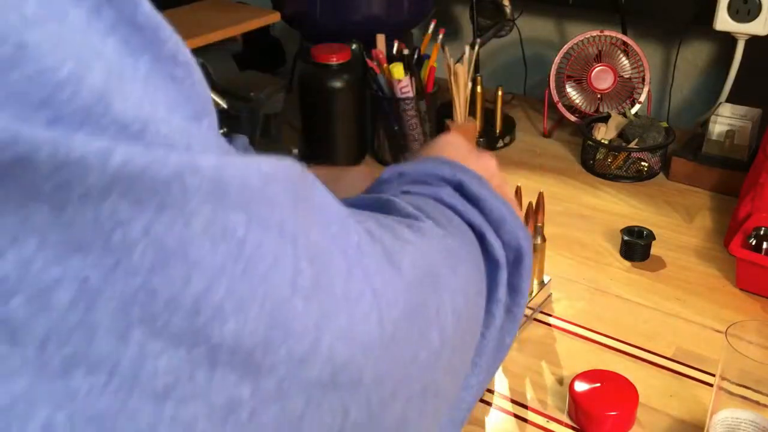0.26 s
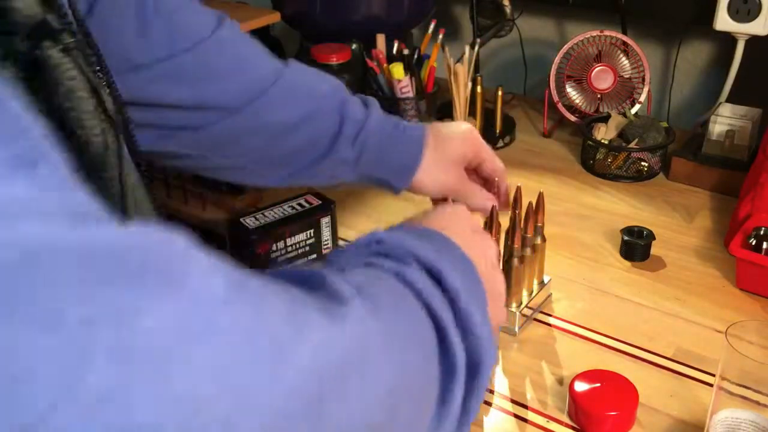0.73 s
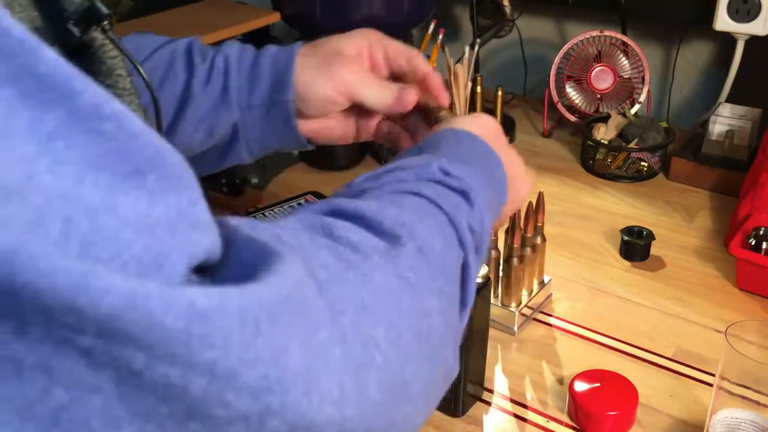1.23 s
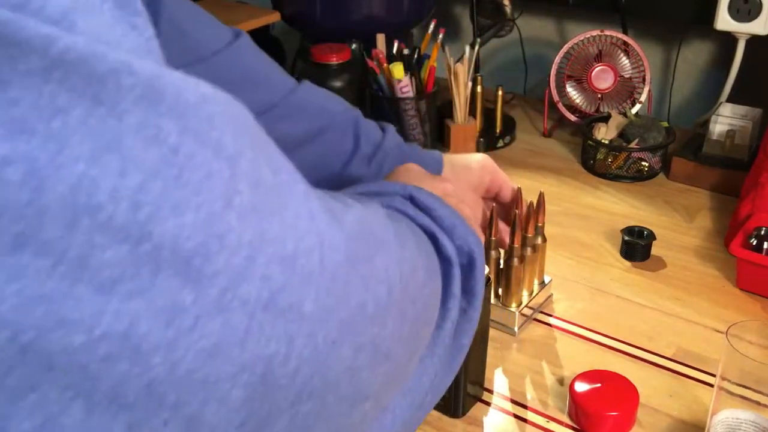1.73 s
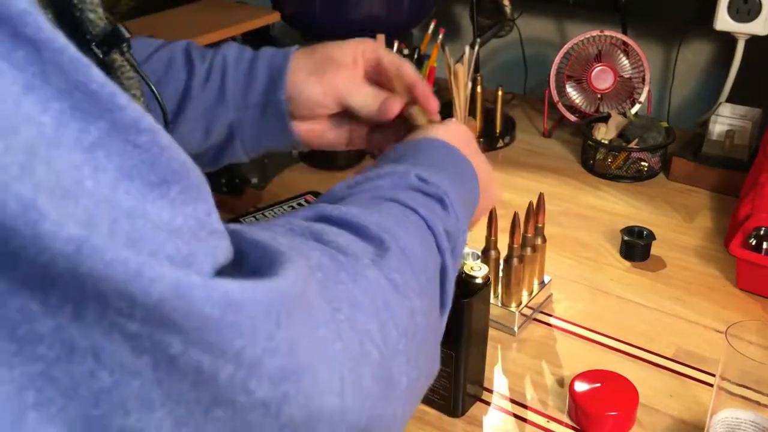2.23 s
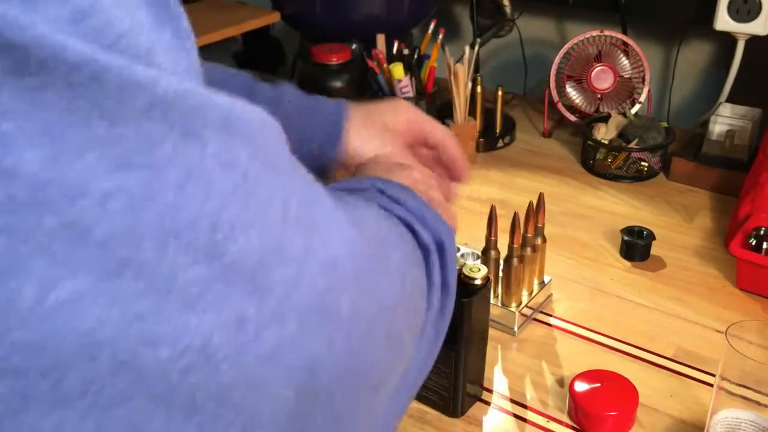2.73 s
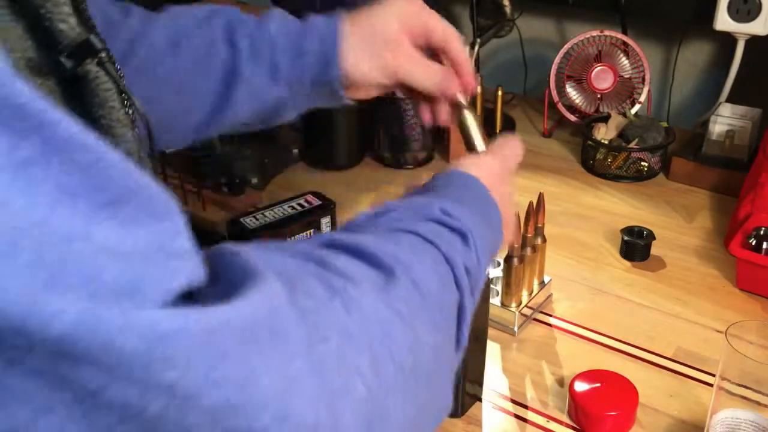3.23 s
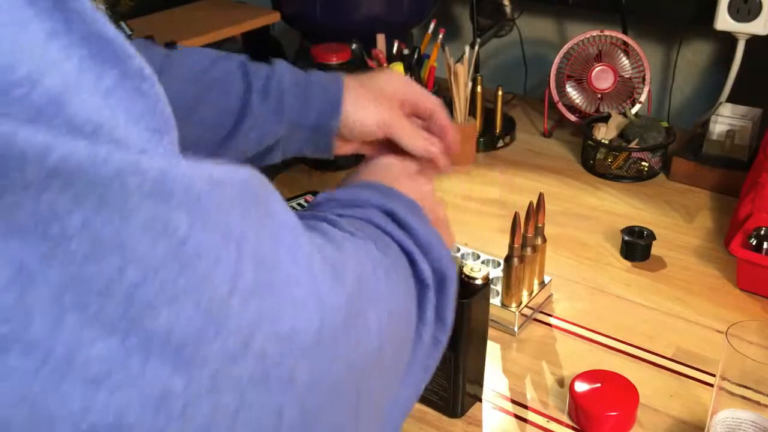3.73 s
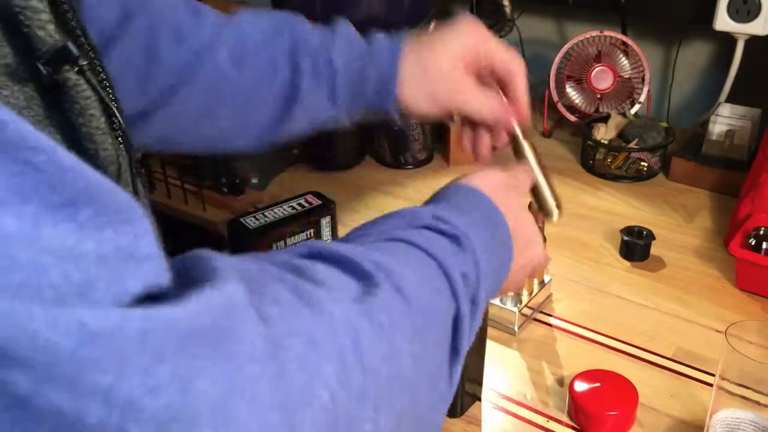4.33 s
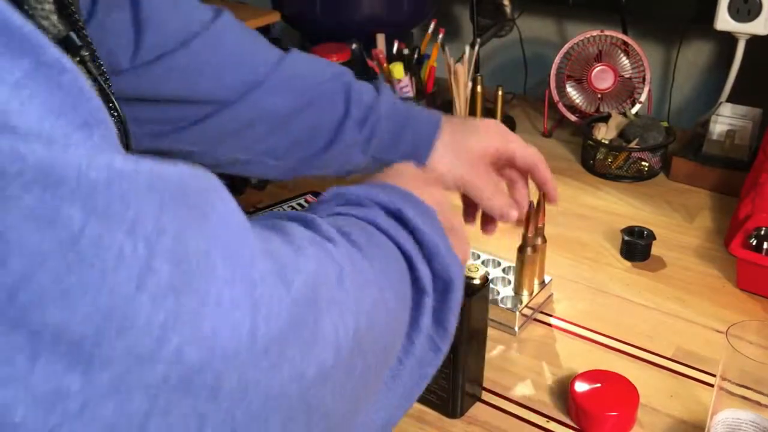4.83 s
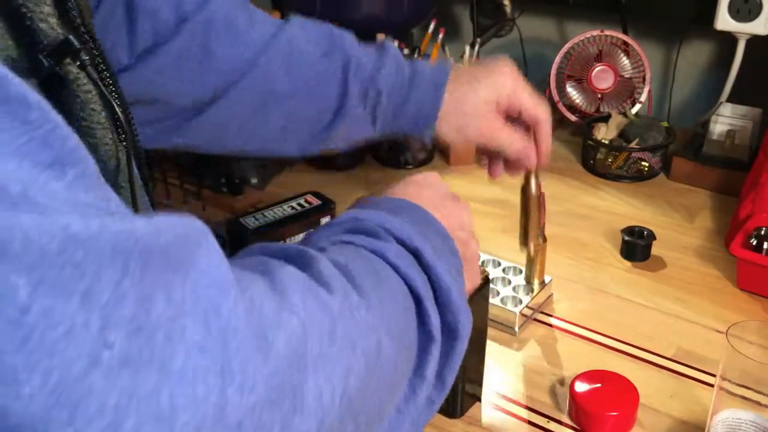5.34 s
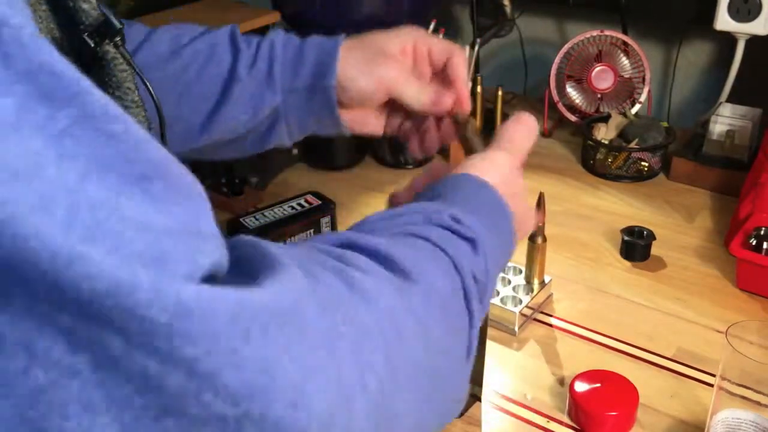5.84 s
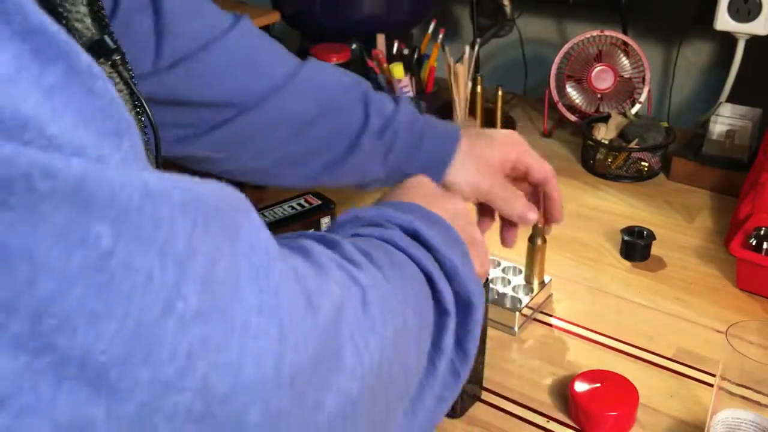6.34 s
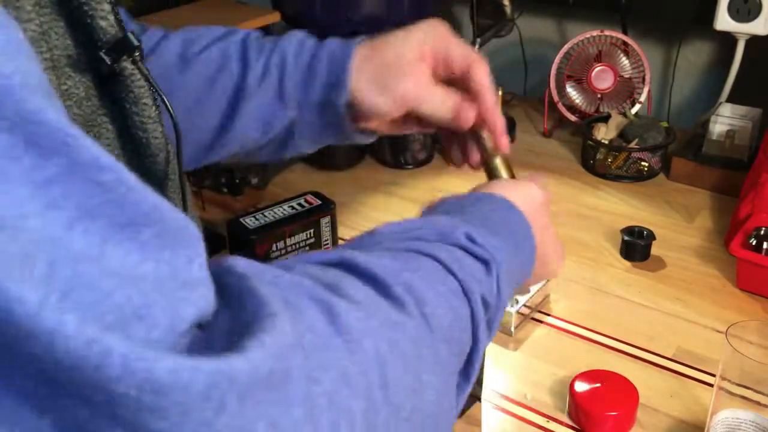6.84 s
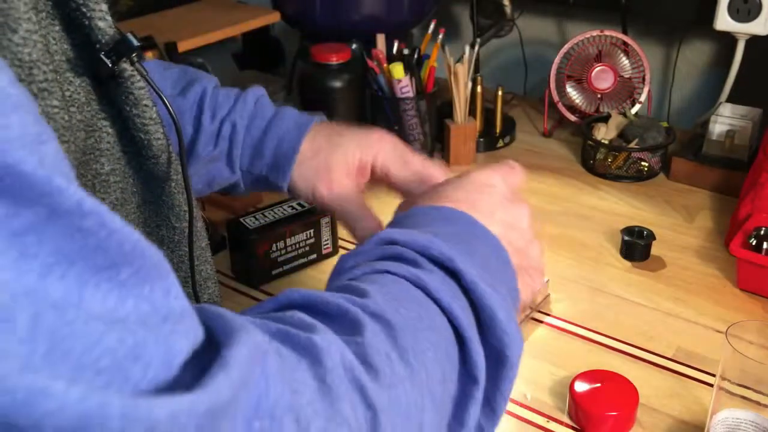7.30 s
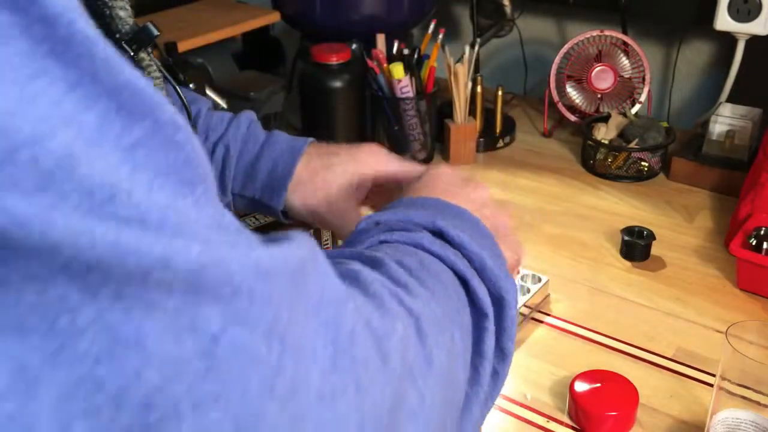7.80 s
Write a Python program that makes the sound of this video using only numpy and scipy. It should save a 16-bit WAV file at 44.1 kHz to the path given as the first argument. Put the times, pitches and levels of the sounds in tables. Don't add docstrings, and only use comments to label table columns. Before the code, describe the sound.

Close to the microphone, hands move brass cartridges from a metal block into a hollow plastic box on a wooden bench. Roughly once a second comes a cluster of loud boxy knocks with metal ticks, separated by light taps, thin ringing pings and short scrapes. Small dry room, faint hum and low handling rumble; the hardest hits overload slightly.

```python
import sys
import numpy as np
from scipy import signal
from scipy.fft import rfft, irfft, next_fast_len
from scipy.io import wavfile
from scipy.ndimage import uniform_filter1d

SR = 44100
rng = np.random.default_rng(int(sys.argv[2]) if len(sys.argv) > 2 else 0)


def natural_amplitude(level_db):
    exponent = np.asarray(level_db, float) / 20
    return 10 ** exponent


def materialize(psi):
    bounded = np.clip(np.atleast_2d(psi).T, -1, 1)
    quanta = np.round(bounded * 32767).astype(np.int16)
    wavfile.write(sys.argv[1], SR, quanta)


N = 355710
END_S = 8.066

# frequency in Hz, density in dB per Hz.
AIR_SPECTRUM = [(53, -19.5), (100, -6), (140, -9.5), (300, -15), (660, -16), (1000, -24.5), (7070, -36),
                (16100, -44.5)]
AIR_DB = -57.5
# frequency in Hz, level in dB rms.
HUM_PARTIALS = [(118.4, -55.5), (242.2, -84.5), (360.7, -65), (479.1, -81), (597.5, -67), (721.4, -74.5)]
# time in seconds, level in dB.
ARM_RUMBLE = [(0.0, -35.5), (1.17, -45.5), (1.5, -37), (1.68, -40.5), (2.13, -40), (2.36, -39.5),
              (3.39, -35), (3.57, -40), (5.5, -44.5), (5.91, -38), (6.31, -46), (6.81, -40.5), (7.77, -44),
              (8.07, -38.5)]
# frequency in Hz, t60 in seconds, strength in dB.
ROOM_BANDS = [(101, 0.3, 16.5), (496, 0.27, 2.5), (2000, 0.28, 5), (5870, 0.19, 4.5), (11760, 0.24, 1.5)]

# start in seconds, length in seconds, level in dB.
SLEEVE_SWISHES = [
    (1.2, 0.44, -61.5),
    (0.088, .16, -63),
    (9.5, 0.27, -71.5),
]
# start in seconds, level in dB, frequency in Hz.
ELBOW_BUMPS = [(0.956, -35, 180), (1.27, -28, 92), (1.369, -25.5, 19), (3, -38, 46), (2.2, -33.5, 14.3),
               (2.269, -26.5, 28), (2.401, -38.5, 103), (3.391, -18.5, 26), (4.54, -28.5, 74),
               (5.12, -23, 160), (7.25, -34, 220), (7.42, -28, 190), (8.0, -21, 91)]
# start in seconds, level in dB.
NEAR_CLICKS = [
    (.160, -40),
    (2.278, -38.5),
    (3.361, -31.5),
    (4.544, -39),
    (6.838, -55),
]

# start in seconds, level in dB, frequency in Hz.
CASE_PINGS = [(.436, -31.5, 3120), (.485, -26.5, 3075), (1.652, -34, 3130), (5.307, -51, 4240),
              (5.34, -66, 4450), (5.608, -41.5, 3050), (6.65, -33.5, 3014)]
# start in seconds, level in dB, frequency in Hz.
NECK_PINGS = [(.976, -45.5, 7450), (1.003, -31.5, 7340), (1.033, -34.5, 8300), (1.033, -36, 11640),
              (1.103, -37, 7300), (1.653, -50, 7320), (2.689, -33, 7460), (2.892, -33.5, 7340),
              (5.025, -53, 6520), (5.307, -44, 6370), (5.382, -46.5, 6430), (5.587, -51, 8400),
              (5.608, -61, 8200), (5.666, -29, 7370), (5.697, -38.5, 7400), (6.433, -43, 8200),
              (7.92, -25.5, 7180)]
# start in seconds, level in dB, frequency in Hz.
BLOCK_PINGS = [(1.652, -47.5, 2200), (7.21, -34, 2000), (7.344, -44, 2000), (5.644, -26, 2030),
               (7.425, -37, 2030), (7.739, -23.5, 1964), (7.888, -18.5, 2030), (7.906, -13, 1979),
               (7.998, -19.5, 2070), (8.01, -22, 2000)]
# start in seconds, level in dB, frequency in Hz.
RATTLES = [(.977, -35, 3290), (1.005, -30.5, 3200), (1.033, -22, 3230), (1.045, -31, 2940),
           (1.103, -24, 3078), (5.45, -42, 2880), (6.433, -28, 2890), (7.228, -46.5, 3150),
           (7.261, -36, 3230), (7.39, -38, 3280)]
# start in seconds, level in dB, frequency in Hz.
GRIPPED_PINGS = [(3.848, -21, 1200), (5.681, -12.5, 1963), (6.597, -48, 3050), (6.598, -46, 4430),
                 (7.203, -23.5, 1920), (7.203, -25.5, 1230), (7.297, -54, 2090), (7.418, -27.5, 2010),
                 (7.663, -28.5, 730), (7.738, -33, 1000), (.448, -33, 2920), (2.837, -31, 797),
                 (3.967, -10.5, 1091), (3.981, -11.5, 898), (3.998, -8.5, 1003), (6.481, -17, 900),
                 (1.864, -7, 680), (5.642, -12, 800), (6.259, -8.5, 810), (7.885, -10.5, 750)]
# start in seconds, level in dB, frequency in Hz.
BENCH_BOOMS = [(.262, -34, 190), (.62, -22.5, 270), (.913, -21.5, 262), (.951, -18.5, 230),
               (1.106, -26, 217), (1.655, -38.5, 271), (2.003, -35, 198), (2.67, -30.5, 384),
               (3.152, -28, 209), (3.225, -39, 200), (3.361, -35.5, 170), (4.237, -27, 400),
               (4.998, -27.5, 300.6), (5.31, -34, 241)]
# start in seconds, level in dB, frequency in Hz.
FREE_LINES = [(2.012, -40, 4500), (2.013, -39, 3250), (2.014, -59.5, 9360), (3.18, -49, 4600),
              (4.33, -48, 4446), (4.33, -65, 9400), (5.305, -50, 4400), (5.378, -50, 4400),
              (5.17, -62, 4100), (5.38, -48.5, 3200)]
# events, t60 in seconds, chatter decay in seconds.
PING_KINDS = [(CASE_PINGS, 0.095, 0.03), (NECK_PINGS, 0.052, 0.012), (BLOCK_PINGS, 0.045, 0.017),
              (RATTLES, 0.034, 0.01), (GRIPPED_PINGS, 0.03, 0.0047), (BENCH_BOOMS, 0.041, 0.017),
              (FREE_LINES, 0.086, 0.02)]
CHATTER_SHARE = 0.35

# start in seconds, length in seconds, level in dB, frequency in Hz.
SETTLING_HUMS = [(1.866, 0.072, -16.5, 640), (2.93, 0.076, -36.5, 610), (3.23, 0.043, -44.5, 261),
                 (3.285, 0.074, -51.5, 750), (5.06, 0.067, -35.5, 566), (5.32, 0.046, -41.5, 424),
                 (5.643, 0.072, -19.5, 553), (.634, .03, -12.5, 616), (2.885, .014, -12, 600),
                 (3.07, 0.062, -48, 1680), (5.073, 0.023, -33, 1640), (6.262, 0.03, -17.5, 610),
                 (7.44, .04, -55, 3280)]
# start in seconds, length in seconds, level in dB, frequency in Hz.
DRAG_HUMS = [(0.276, 0.015, -41, 710), (.88, 0.062, -37.5, 600), (1.034, 0.039, -33.5, 1750),
             (1.039, 0.039, -40, 3080), (1.107, 0.052, -55, 3120), (1.798, 0.014, -32.5, 1720),
             (1.998, 0.034, -38, 1740), (2.92, 0.098, -39.5, 1080), (3.069, 0.031, -54, 3120),
             (3.078, 0.046, -41, 1024), (3.171, 0.039, -44.5, 3170), (3.183, 0.027, -57, 4600),
             (3.216, 0.036, -41, 1680), (4.31, 0.04, -49, 1950), (4.315, 0.048, -46.5, 1694),
             (5.302, 0.1, -61, 4400), (6.384, 0.17, -42, 1960), (6.6, 0.034, -55, 4270),
             (7.209, 0.076, -48, 1150), (7.218, 0.098, -52, 563), (7.331, 0.039, -48.5, 585),
             (7.553, 0.11, -52, 576), (7.568, 0.084, -49, 1120), (7.575, 0.11, -49, 2040),
             (7.6, 0.073, -54.5, 3170), (7.624, 0.068, -40.5, 590), (7.677, 0.16, -45, 596),
             (7.708, 0.019, -54, 1510), (7.71, 0.037, -46, 3290), (7.757, 0.031, -33, 940),
             (7.78, 0.032, -48, 2000), (7.892, 0.03, -26.5, 3250), (7.995, 0.011, -27, 3425)]
DRAG_T60_S = 0.038

# start in seconds, length in seconds, scrape level in dB,
# case song level in dB, song tilt in dB per octave.
SLIDES = [(0.264, 0.077, -46.5, -71.5, 9), (0.32, 0.15, -49.5, -72, 3), (0.977, 0.244, -42.5, -76.5, -13),
          (1.994, 0.048, -46.5, -54.5, 1.5), (3.055, 0.046, -50, -68, -5.5),
          (3.153, 0.064, -42, -59.5, 1.5), (3.24, 0.094, -48, -83, -7), (3.21, 0.024, -39, -63.5, 9),
          (3.947, 0.031, -47.5, -78, 3.5), (4.302, 0.084, -50, -56, 6.5), (4.969, 0.18, -46.5, -78, -6.5),
          (5.288, 0.09, -44.5, -66.5, -1.5), (5.365, 0.04, -49, -56.5, -7.5),
          (6.389, 0.088, -46, -67.5, -1.5), (6.593, 0.08, -47.5, -40.5, -8),
          (7.202, 0.165, -59.5, -71.5, -12.5), (7.39, 0.074, -66, -78, -6.5), (7.583, 0.13, -63, -66, 6),
          (7.707, 0.13, -49, -60, -3)]
# frequency in Hz, level in dB, t60 in seconds.
CASE_MODES = [(3040, 0, .11), (3230, -12, .1), (4390, -5, .13), (6350, -13, .07), (6520, -11, .1),
              (9420, -21, .14), (10190, -20, .14), (13170, -33, .14), (13640, -33, .1), (15300, -44, .08)]
SCRAPE_HZ, SLIDE_FADE_DB = 2412, -12

# frequency in Hz, level in dB, t60 in seconds.
BOX_MODES = [(290, -8.5, 0.076), (408, -6.5, 0.05), (572.3, 5, 0.062), (634.5, 1, 0.049),
             (760, -3.5, 0.052), (895, 1, 0.052), (980, -1, 0.036), (1080, -2.5, .06), (1286, -5, 0.045),
             (1280, -6, 0.1), (1554, -12.5, 0.12), (1760, -7.5, 0.045)]
# frequency in Hz, density in dB per Hz.
TICK_SPECTRUM = [(2350, -32), (4000, -11), (4490, 8), (5450, 11), (7290, 6), (15200, -19.5), (16100, -30)]
LUMP_DB = 3.5
MODE_LUMP_DB, MODE_SPREAD_SHARE = 1.5, 0.008
AIR_MODES_HZ = (500, 700)
EMPTY_RISE_SHARE, FILL_S = 0.2, 2.2
SOFT_LINGER_DB_PER_DB = 0.092

# start in seconds, hollow level in dB, clack level in dB, tick level in dB.
FLOOR_THUDS = [(.446, -18.5, -26, -22.5), (.632, 0, -16, -17.5), (.651, -3.5, -16.5, -17),
               (1.868, 1, -7, -13), (1.881, -1, -15.5, -14.5), (1.908, 1.5, -9.5, -16),
               (2.85, 6, -3.5, -11.5), (2.865, 7, -8, -13), (2.874, -3.5, -14.5, -11),
               (2.886, -0.5, -20.5, -30), (3.848, -13, -26.5, -31), (3.988, -1, -19, -10.5),
               (4, 0, -24, -11.5), (4.007, 1, -23.5, -24.5), (4.033, -27.5, -44, -65),
               (5.074, -10, -22, -42.5), (5.642, -2.5, -20.5, -30.5), (5.65, -4, -11, -24),
               (5.664, -3.5, -20, -21.5), (5.681, 2, -7, -16), (5.695, -22.5, -46, -31),
               (6.262, -17.5, -27.5, -39.5), (6.455, -14.5, -18, -33), (7.884, -6, -26, -17.5),
               (7.892, -2, -14, -20), (7.906, -3.5, -18, -12.5), (7.913, 4, -22.5, -18),
               (8.01, -3.5, -38, -40)]
# start in seconds, hollow level in dB, clack level in dB, tick level in dB.
CHOKED_REBOUNDS = [(.435, -10, -27, -33), (.484, -24, -29, -53), (.612, -4.5, -14, -55),
                   (.625, -27, -21, -34), (.641, 1.5, -3.5, -10.5), (.667, -18.5, -36, -66),
                   (.699, -16.5, -43, -44), (1.654, -33.5, -26.5, -50), (1.774, -8.5, -29, -42),
                   (1.924, -6, -24, -35), (2.001, -27, -23.5, -49), (2.013, -42.5, -24, -33),
                   (2.669, -19, -17.5, -31), (4.021, -6.5, -24, -37), (5.086, -13, -47, -54),
                   (6.271, -12, -18, -16), (6.485, 1, -12.5, -22), (6.494, -16, -29, -32),
                   (7.204, -31, -33, -46.5), (7.418, -15, -31, -46), (7.75, -23, -17.5, -21.5),
                   (7.923, -4.5, -14, -31)]
# start in seconds, hollow level in dB, clack level in dB, tick level in dB.
SLOT_TAPS = [(.494, -30, -25, -26.5), (.887, -37.5, -33, -68), (.975, -27.5, -23, -40.5),
             (1.799, -14, -19.5, -49), (1.959, -32.5, -35, -30.5), (2.691, -15, -19, -25.5),
             (2.77, -14.5, -29, -32.5), (3.239, -29.5, -30.5, -49), (4.319, -35, -31, -54.5),
             (5.051, -18, -46.5, -50), (5.305, -22.5, -27.5, -62), (5.45, -35, -32, -38.5),
             (5.555, -32, -39.5, -74), (5.607, -25.5, -28.5, -32), (6.403, -16, -27.5, -33),
             (6.431, -16.5, -24, -32), (6.594, -17, -32.5, -40), (7.344, -40.5, -43, -65.5),
             (7.441, -22, -27, -40), (7.71, -33, -35, -60)]
# start in seconds, hollow level in dB, clack level in dB, tick level in dB.
RIM_STRIKES = [(.325, -41, -32.5, -46), (.615, 3, -6, -8.5), (1.002, -30, -23, -24),
               (1.03, -16, -19.5, -19.5), (1.667, -37.5, -42, -38.5), (1.824, -21, -32, -52.5),
               (1.896, 2.5, -5, -9), (2.032, -37, -23, -49), (2.844, -2.5, -20, -27),
               (2.911, -12.5, -35, -38.5), (3.966, -10, -36, -27), (3.979, -2.5, -38.5, -20),
               (4.981, -18.5, -28.5, -40), (5.221, -31.5, -42, -67), (5.585, -27.5, -29, -42),
               (7.26, -41, -25, -37), (7.394, -43, -41, -38), (7.561, -31, -41, -66),
               (7.663, -20.5, -30.5, -29), (7.737, -19, -24, -42), (7.764, -36, -23, -33),
               (7.844, -16, -32, -33), (7.996, 2, -8, -15.5)]
# start in seconds, hollow level in dB, clack level in dB, tick level in dB.
BLOCK_ROCKS = [(.26, -36.5, -31, -38), (.911, -19, -26, -67.5), (3.086, -22, -55, -76.5),
               (3.218, -34, -19, -15.5), (4.236, -21, -28.5, -75), (4.292, -30, -37.5, -53),
               (4.996, -23.5, -26, -48), (5.291, -31, -45, -65), (5.379, -36.5, -35, -63),
               (6.648, -39.5, -35, -57), (7.242, -43.5, -34, -40), (7.538, -58, -37, -47)]
# start in seconds, hollow level in dB, clack level in dB, tick level in dB.
KNUCKLE_NUDGES = [(.549, -15.5, -22, -29), (.95, -17, -34, -68), (1.102, -20.5, -21, -31),
                  (1.863, -10, -17, -20.5), (3.071, -29.5, -27.5, -56.5), (3.151, -25, -34.5, -58),
                  (4.09, -26.5, -29, -54.5), (5.024, -28.5, -36.5, -38)]
# start in seconds, hollow level in dB, clack level in dB, tick level in dB.
EDGE_SNAPS = [(.285, -36, -54, -66), (.551, -9.5, -38, -43), (.618, -2, -18.5, -28),
              (2.771, -36.5, -43, -53), (3.293, -43, -44, -58), (3.848, -16, -31, -46),
              (3.967, -8.5, -23, -37), (3.981, -4, -30, -24), (3.999, 0, -14, -27), (4.237, -26, -34, -65),
              (4.337, -34, -24.5, -52), (6.465, -14, -26, -42), (7.202, -23, -31, -40),
              (7.225, -36, -36, -47), (7.285, -39, -39, -50), (7.305, -49, -42, -54), (7.36, -43, -44, -55),
              (7.463, -38, -35, -46), (7.495, -52, -52, -60), (7.553, -42, -51, -59),
              (7.785, -30, -33, -48.5), (7.851, -20.5, -23, -40)]
# start in seconds, hollow level in dB, clack level in dB, tick level in dB.
FLAT_DROPS = [
    (6.258, -2.5, -17.5, -28),
]
# start in seconds, hollow level in dB, clack level in dB, tick level in dB.
BOX_JOLTS = [
    (.966, -18.5, -45, -70),
    (1.866, -20, -50, -70),
    (5.31, -25, -48, -70),
    (6.592, -17.5, -47, -60),
    (7.887, -17.5, -50, -70),
    (7.997, -5, -50, -70),
]
# events, favoured pitch in Hz, full-blow ring time in seconds, loose crunch in dB.
BLOW_KINDS = [(FLOOR_THUDS, 571, 0.069, -7.5), (CHOKED_REBOUNDS, 546, 0.057, -8), (SLOT_TAPS, 670, 0.051, -5.5),
              (RIM_STRIKES, 920, 0.045, -4.5), (BLOCK_ROCKS, 372, 0.042, 2.1), (KNUCKLE_NUDGES, 351, 0.05, 2),
              (EDGE_SNAPS, 1060, 0.04, -11), (FLAT_DROPS, 606, 0.1, -7), (BOX_JOLTS, 360, 0.025, 1.8)]


def evened(x):
    return x / np.sqrt(np.mean(x ** 2) + 1e-20)


def read(points, hz):
    point_hz, value = np.transpose(points)
    return np.interp(np.log(hz + 1), np.log(point_hz + 1), value)


def level(rows):
    s, db = np.transpose(rows)
    return natural_amplitude(np.interp(np.arange(N) / SR, s, db))


def add(mix, s, sound):
    part = mix[round(s * SR):][:len(sound)]
    part += sound[:len(part)]


def noise(size, colour_db):
    fast = next_fast_len(size, True)
    spectrum = rfft(rng.standard_normal(size), fast)
    gain = natural_amplitude(colour_db(np.fft.rfftfreq(fast, 1 / SR)))
    return evened(irfft(spectrum * gain, fast)[:size])


def hump(hz, centre_hz, db, offset_hz=1):
    return db * np.log2((hz + offset_hz) / centre_hz) ** 2


def lumpy(hz):
    knots_hz = np.arange(0, SR / 2, 450.)
    return LUMP_DB * np.interp(hz, knots_hz, rng.standard_normal(len(knots_hz)))


def ring(hz, db, t60, size=5000):
    t = np.arange(size)[:, None] / SR
    decay = natural_amplitude(db - 60 * t / np.maximum(t60, 0.003))
    return (decay * np.sin(2 * np.pi * hz * t)).sum(1)


def background():
    t = np.arange(N) / SR
    air = natural_amplitude(AIR_DB) * noise(N, lambda f: read(AIR_SPECTRUM, f))
    hum = np.zeros(N)
    for hz, db in HUM_PARTIALS:
        waver_db = 0.5 * noise(N, lambda f: -6 * f)
        hum += natural_amplitude(db + 2.0 + waver_db) * np.sin(2 * np.pi * (hz * t + rng.random()))
    lumps = natural_amplitude(2.5 * noise(N, lambda f: -4 * f))
    rumble = level(ARM_RUMBLE) * lumps * noise(N, lambda f: hump(f, 12, -4, 2))
    return air + hum + rumble


def sleeves():
    mix = np.zeros(N)
    for s, length_s, db in SLEEVE_SWISHES:
        size = round(length_s * SR)
        cloth = noise(size, lambda f: hump(f, 2800, -4) + lumpy(f))
        add(mix, s, natural_amplitude(db) * signal.windows.hann(size) * cloth)
    return mix


def bumps():
    mix = np.zeros(N)
    for s, db, hz in ELBOW_BUMPS:
        add(mix, s, -natural_amplitude(db) * signal.windows.hann(round(SR / hz)))
    return mix


def clicks():
    mix = np.zeros(N)
    decay_db = -60 * np.arange(300) / SR / 0.0051
    for s, db in NEAR_CLICKS:
        add(mix, s, natural_amplitude(db + decay_db) * noise(300, lambda f: hump(f, 3200, -3.5, 99)))
    return mix


def ping(db, hz, t60, chatter_s):
    size = 4000
    chatter = CHATTER_SHARE * np.exp(-np.arange(size) / SR / chatter_s) * rng.standard_normal(size)
    chatter *= rng.random(size) < 0.02
    chatter[0] = 1
    partial_hz = hz + np.array([4.5, 61.5, -130., 242.0])
    partial_db = db + np.array([3.0, -6.5, -17.0, -20.5])
    partials = ring(partial_hz, partial_db, t60, size=6000)
    return signal.fftconvolve(chatter / np.linalg.norm(chatter), partials)


def pings():
    mix = np.zeros(N)
    for events, t60, chatter_s in PING_KINDS:
        for s, db, hz in events:
            add(mix, s, ping(db, hz, t60, chatter_s))
    return mix


def drags(rows):
    mix = np.zeros(N)
    for s, length_s, db, hz in rows:
        size = round(length_s * SR)
        clumps = natural_amplitude(4.2 * evened(uniform_filter1d(rng.standard_normal(size), 120)))
        slips = signal.windows.tukey(size, 0.4) * clumps * rng.standard_normal(size)
        mode = ring(hz * np.array([0.97, 1, 1.04]), np.array([-6., 0, -7.]), DRAG_T60_S, size=3000)
        hum = signal.fftconvolve(slips, mode)
        add(mix, s, natural_amplitude(db) * hum / np.sqrt(np.mean(hum[:size] ** 2)))
    return mix


def slide(length_s, scrape_db, song_db, tilt_db):
    size = round(length_s * SR)
    clumps_db = 3.2 * evened(uniform_filter1d(rng.standard_normal(size), 90))
    fade_db = SLIDE_FADE_DB * np.arange(size) / size
    stroke = signal.windows.tukey(size, 0.55) * natural_amplitude(clumps_db + fade_db)
    scrape = stroke * noise(size, lambda f: hump(f, SCRAPE_HZ, -8, 30) + lumpy(f))
    scrape += natural_amplitude(7.0) * stroke * noise(size, lambda f: hump(f, 420, -9))
    song = np.zeros(size + 8000)
    for hz, db, t60 in CASE_MODES:
        slips = stroke * rng.standard_normal(size)
        pair = ring(hz * np.array([1, 1.014]), np.array([0, -5.]), t60, size=8001)
        mode = signal.fftconvolve(slips, pair)
        mode_db = song_db + db + tilt_db * np.log2(hz / CASE_MODES[0][0])
        song += natural_amplitude(mode_db) * mode / np.sqrt(np.mean(mode[:size] ** 2))
    add(song, 0, natural_amplitude(scrape_db) * scrape)
    return song


def slides():
    mix = np.zeros(N)
    for s, *settings in SLIDES:
        add(mix, s, slide(*settings))
    return mix


def box_ring(hz, t60, lift):
    mode_hz, mode_db, mode_t60 = np.transpose(BOX_MODES)
    is_air = (mode_hz > AIR_MODES_HZ[0]) & (mode_hz < AIR_MODES_HZ[1])
    mode_hz = np.where(is_air, mode_hz * lift, mode_hz)
    near_db = mode_db + hump(mode_hz, hz, -28, 0) + MODE_LUMP_DB * rng.standard_normal(len(mode_hz))
    near_db -= 10 * np.log10((natural_amplitude(near_db) ** 2).sum())
    mode_hz = mode_hz * (1 + MODE_SPREAD_SHARE * rng.standard_normal(len(mode_hz)))
    force = 0.14 * np.exp(-np.arange(400) / SR / 0.0053) * rng.standard_normal(400)
    force[8] += 1.5
    box = signal.fftconvolve(force, ring(mode_hz, near_db, mode_t60 * t60 / 0.056))[:5000]
    return box / np.sqrt(2 * np.mean(box[:400] ** 2))


def knock(hollow_db, clack_db, tick_db, hz, t60, lift, crunch_db):
    t = np.arange(5000) / SR
    hz = hz * lift if hz < AIR_MODES_HZ[1] else hz

    def dying(t60):
        return natural_amplitude(-60 * t / t60) * np.minimum(t / 0.0017, 1)

    box = box_ring(hz, t60, lift)
    crunch = noise(len(t), lambda f: hump(f, 1.45 * hz, -13)) * dying(t60)
    contact = np.sin(2 * np.pi * np.sqrt(1500 * hz) * t) * np.exp(-((t - 0.0015) / 0.002) ** 2)
    shell = box + natural_amplitude(crunch_db) * crunch + natural_amplitude(-5.5) * contact
    too_small_for_bass = signal.butter(2, 0.44 * hz, "high", fs=SR, output="sos")
    shell = signal.sosfilt(too_small_for_bass, shell)
    bench_hz = 60 * (1 + 0.12 * rng.standard_normal())
    bench = np.sin(2 * np.pi * bench_hz * t) * t / 0.073 * np.exp(-t / 0.012)
    hollow = shell + natural_amplitude(-13.5) * bench

    clack = noise(len(t), lambda f: hump(f, 2600, -12) + lumpy(f))
    clack *= dying(0.81 * t60) + 0.19 * dying(0.0033)
    tick = noise(len(t), lambda f: read(TICK_SPECTRUM, f) + lumpy(f))
    tick *= dying(0.83 * t60) + 1.2 * dying(0.0016)
    whole = natural_amplitude(hollow_db - 7.0) * hollow + natural_amplitude(clack_db - 7.0) * clack + natural_amplitude(tick_db - 8.5) * tick
    return whole * np.minimum((t[-1] - t) / 0.03, 1)


def knocks():
    mix = np.zeros(N)
    for events, hz, t60, crunch_db in BLOW_KINDS:
        for s, hollow_db, clack_db, tick_db in events:
            ring_s = t60 * natural_amplitude(-SOFT_LINGER_DB_PER_DB * hollow_db)
            lift = 1 + EMPTY_RISE_SHARE * np.exp(-s / FILL_S)
            add(mix, s + 0.0012, knock(hollow_db, clack_db, tick_db, hz, ring_s, lift, crunch_db))
    return mix


def room(x):
    taps = np.zeros(SR // 2)
    at = np.arange(150, len(taps) - 20, 20)
    taps[at + rng.integers(0, 20, len(at))] = rng.choice([-1., 1.], len(at))
    hz, t, z = signal.stft(taps, SR, nperseg=256)
    bands = np.array(ROOM_BANDS)
    t60 = read(bands[:, [0, 1]], hz)[:, None]
    strength_db = read(bands[:, [0, 2]], hz)[:, None]
    tail = signal.istft(z * natural_amplitude(strength_db - 60 * t / t60), SR, nperseg=256)[1]
    return signal.fftconvolve(x, tail / np.linalg.norm(tail))[:N]


def scene():
    close = sleeves() + bumps() + clicks() + pings() + drags(SETTLING_HUMS)
    hands = drags(DRAG_HUMS) + slides() + knocks()
    return (background() + close + hands + natural_amplitude(-11.0) * room(hands))[None]


def band_limit(x):
    return signal.sosfilt(signal.butter(12, 16270, fs=SR, output="sos"), x)


def record(dry):
    clipped = np.clip(dry, -0.99, 0.99)
    clipped = clipped * np.clip((END_S - np.arange(N) / SR) / 0.004, 0, 1)
    lowpass = signal.firwin(511, 16400, window=("kaiser", 9), fs=SR)
    mix = signal.oaconvolve(clipped, lowpass[None], "same")
    return band_limit(mix)


dry = scene()
out = record(dry)
materialize(out)
```